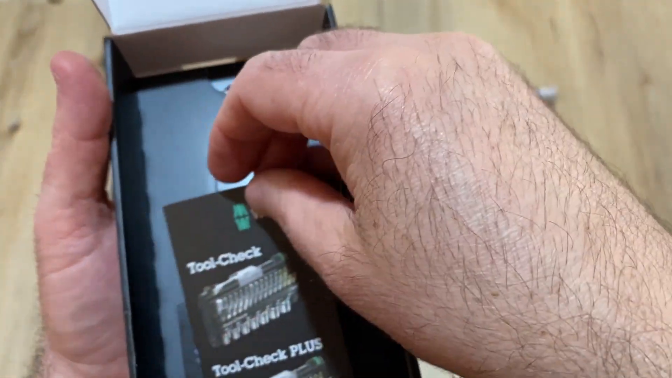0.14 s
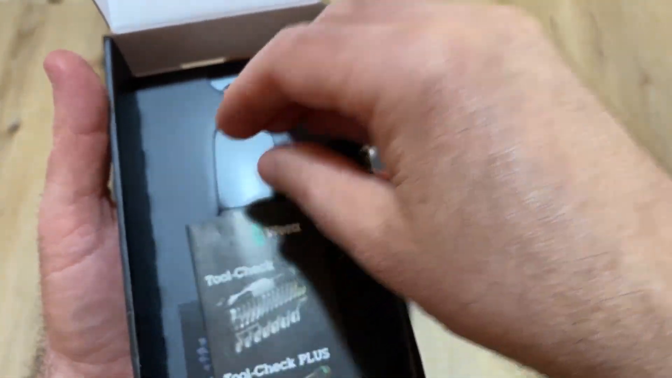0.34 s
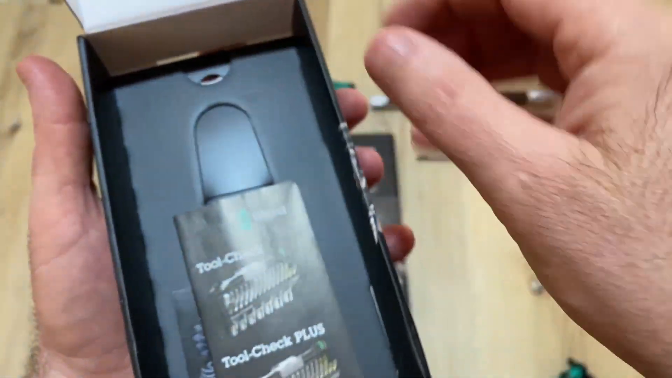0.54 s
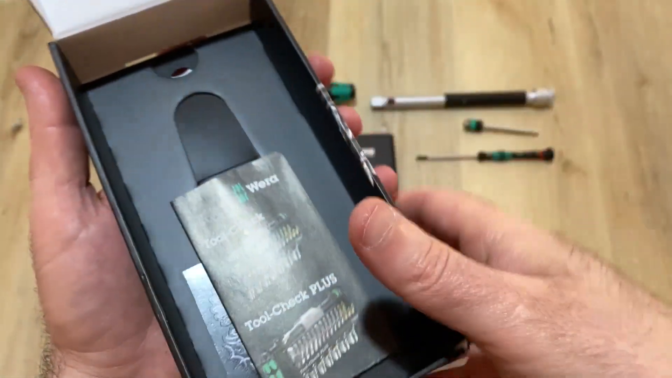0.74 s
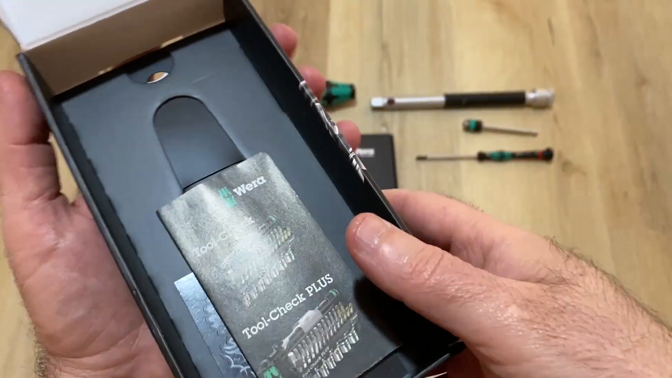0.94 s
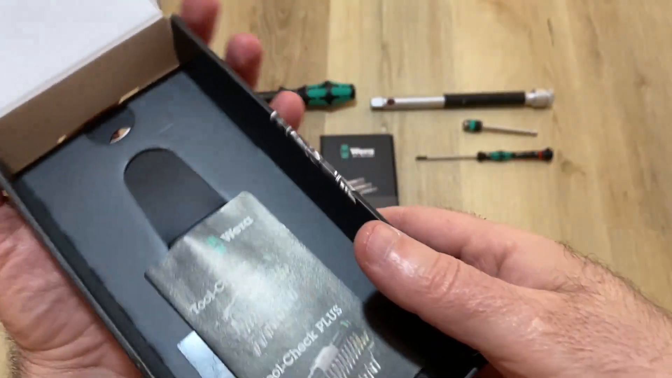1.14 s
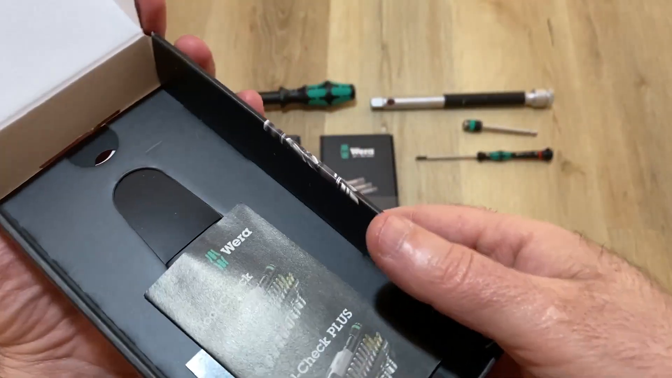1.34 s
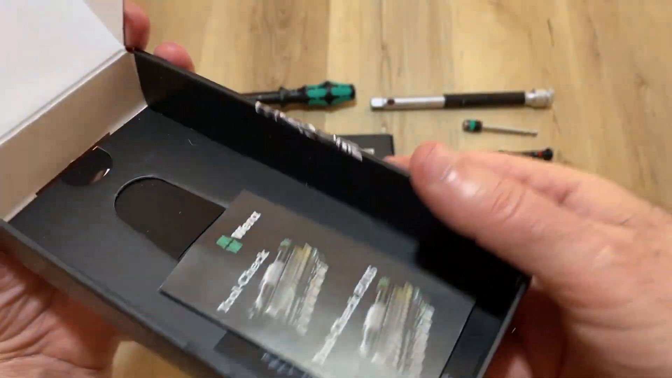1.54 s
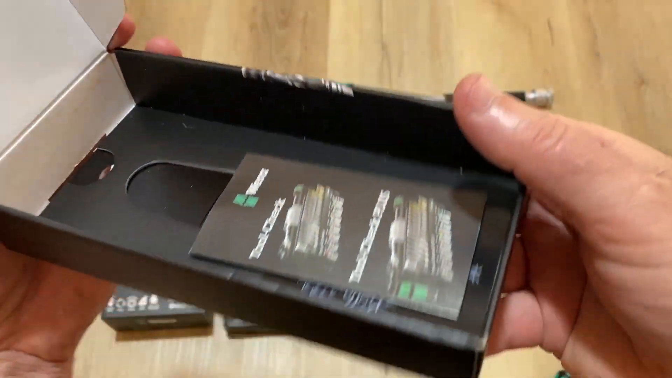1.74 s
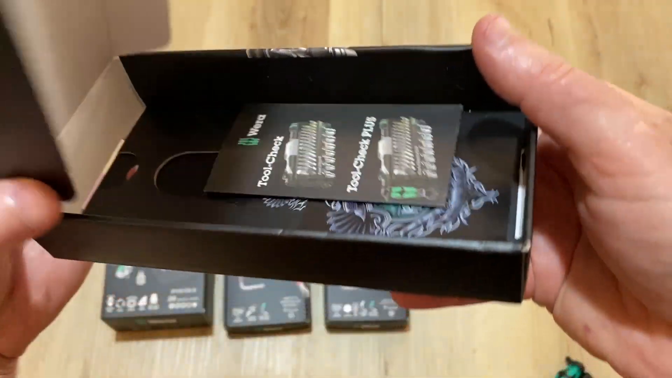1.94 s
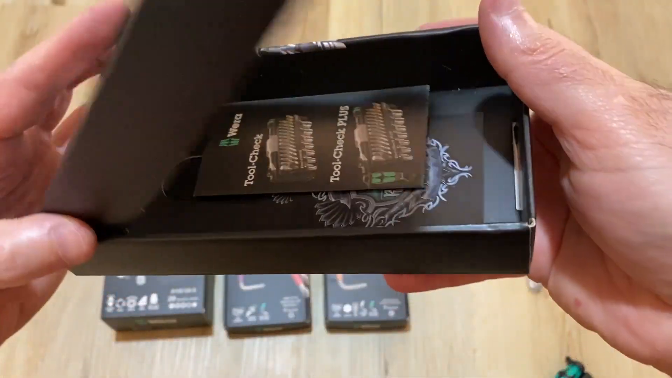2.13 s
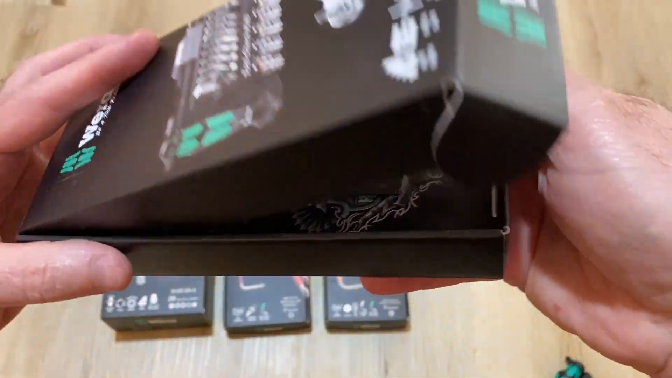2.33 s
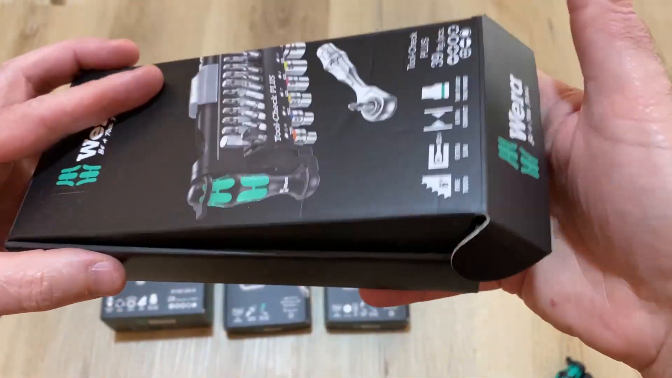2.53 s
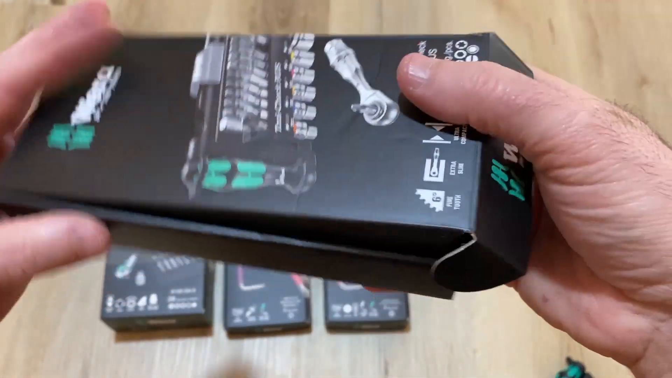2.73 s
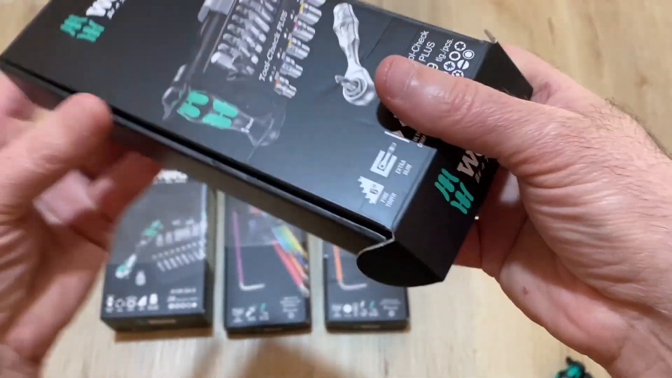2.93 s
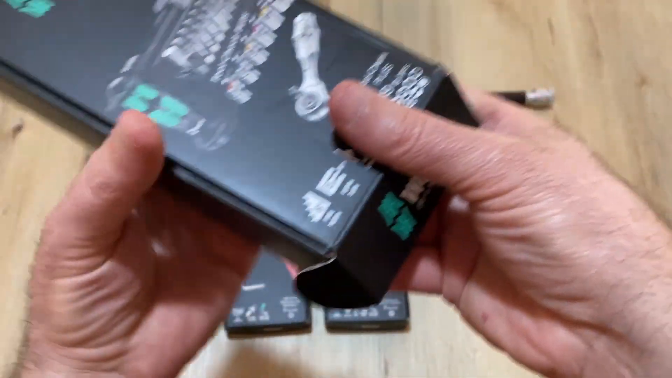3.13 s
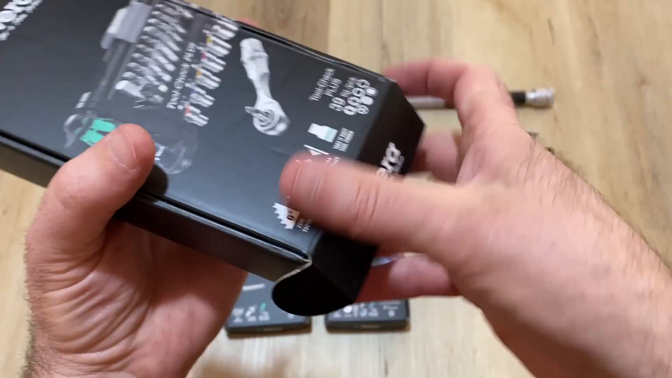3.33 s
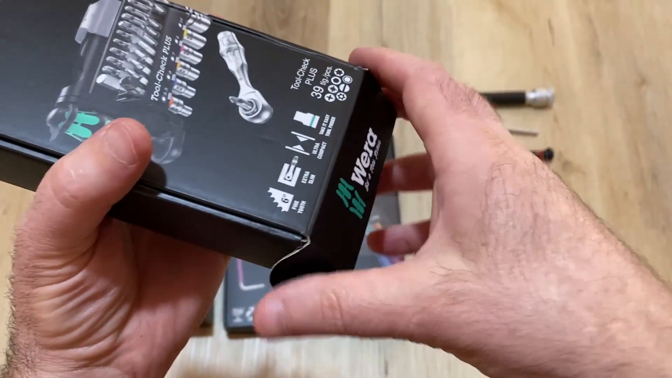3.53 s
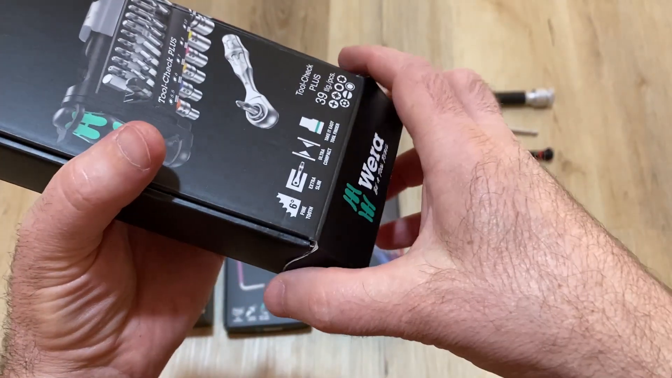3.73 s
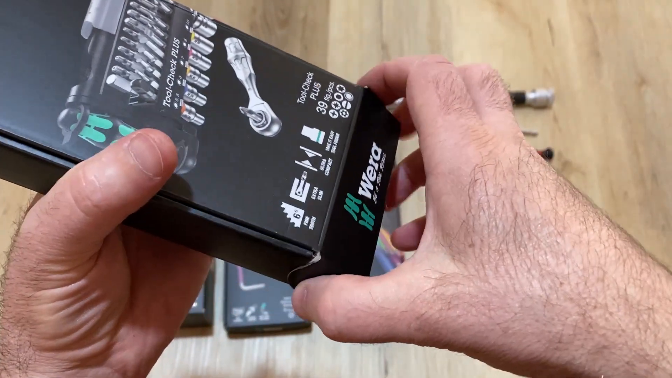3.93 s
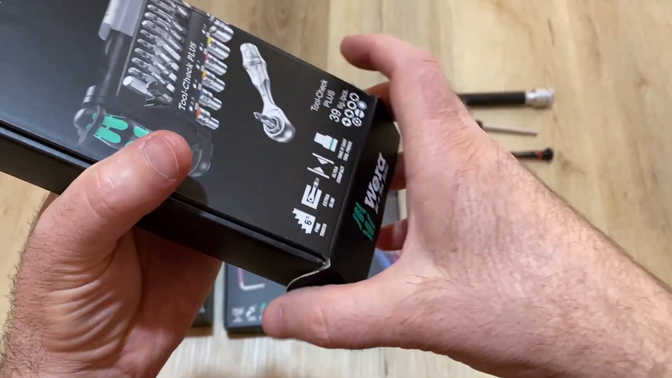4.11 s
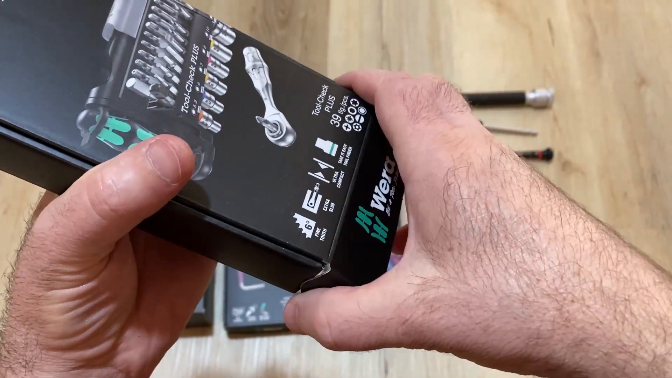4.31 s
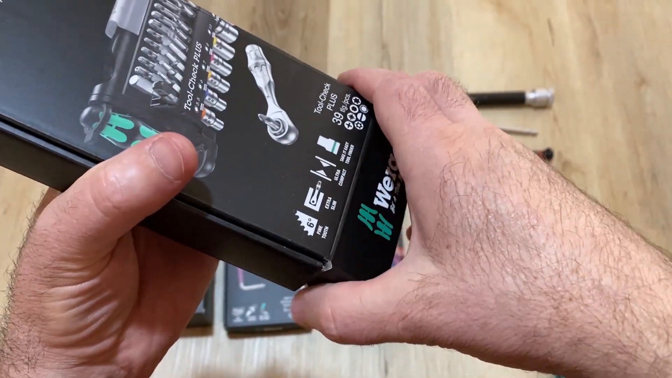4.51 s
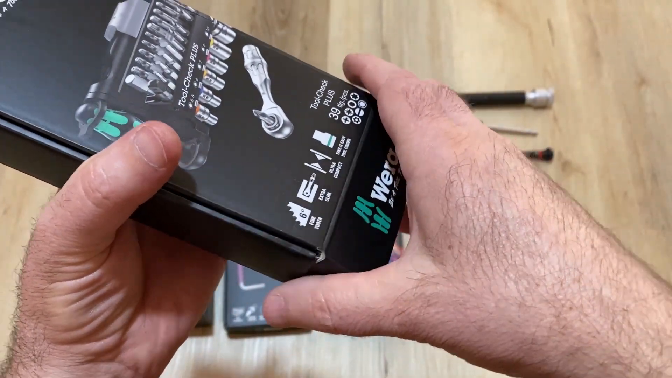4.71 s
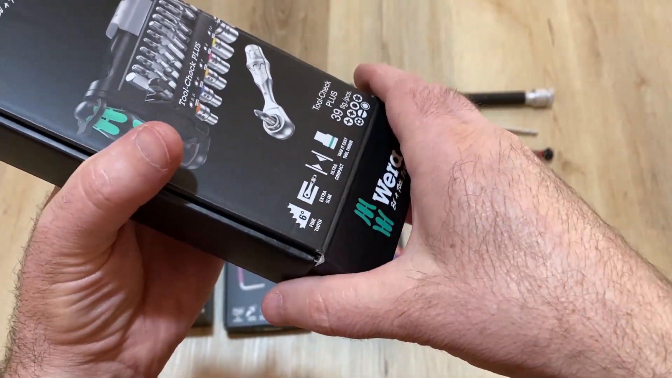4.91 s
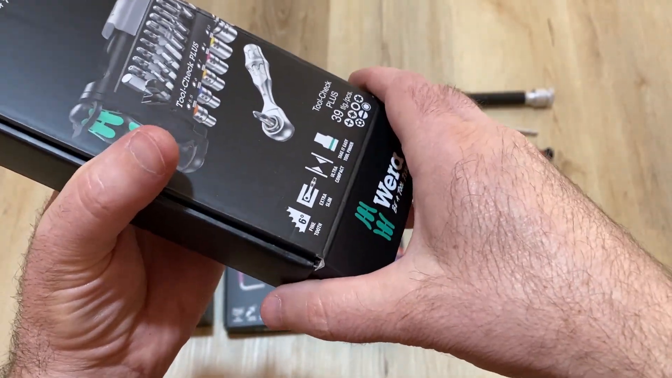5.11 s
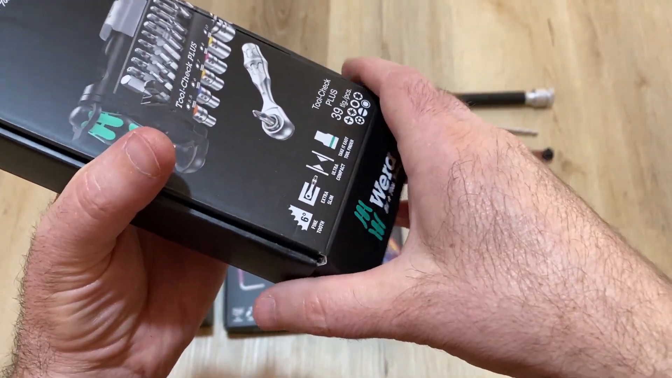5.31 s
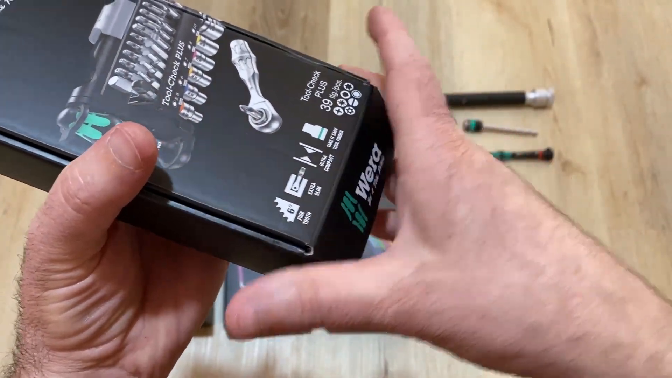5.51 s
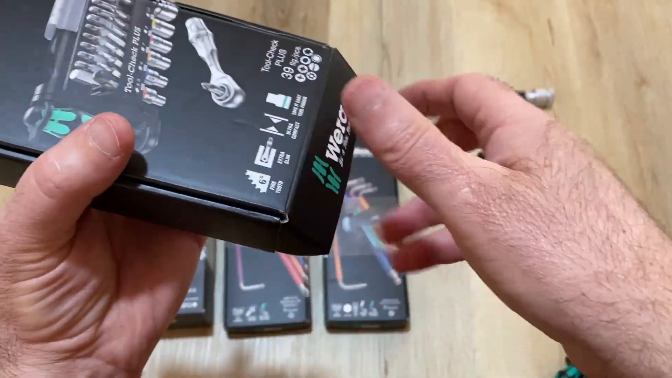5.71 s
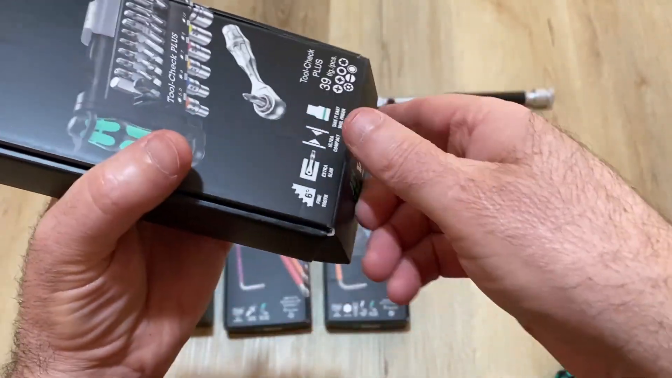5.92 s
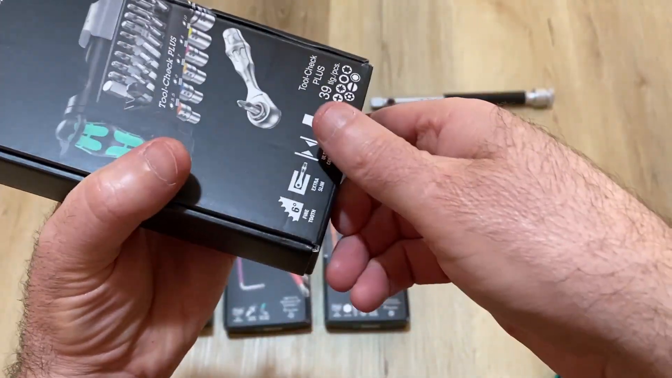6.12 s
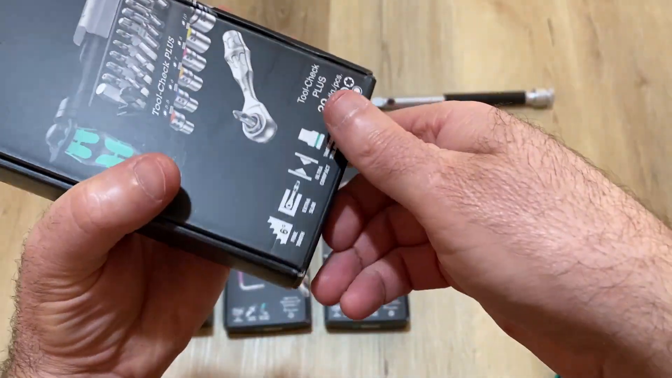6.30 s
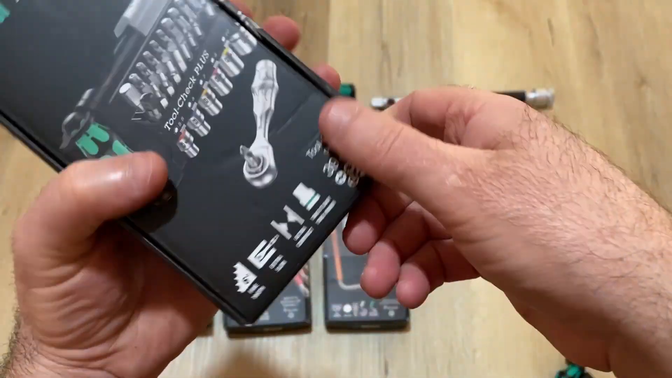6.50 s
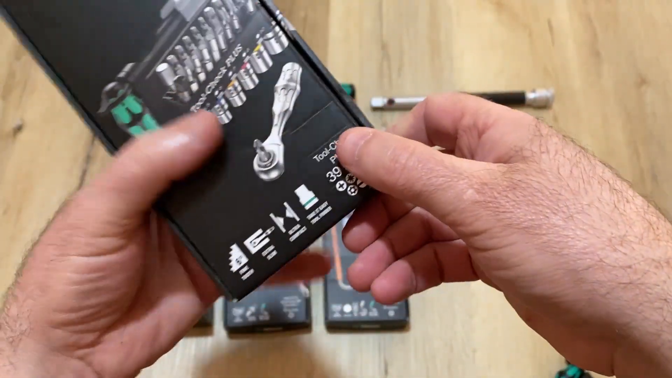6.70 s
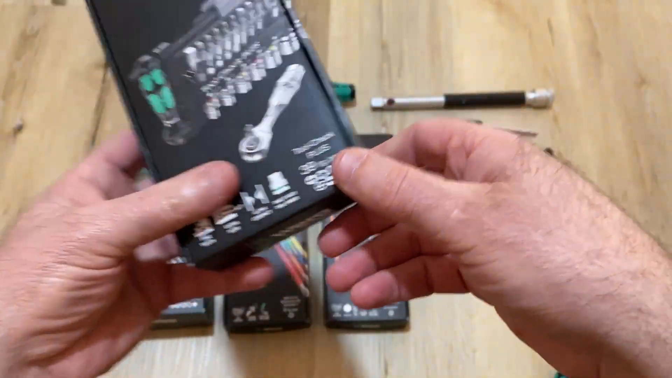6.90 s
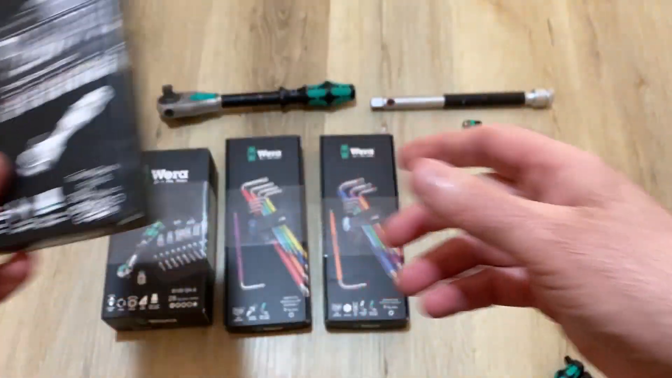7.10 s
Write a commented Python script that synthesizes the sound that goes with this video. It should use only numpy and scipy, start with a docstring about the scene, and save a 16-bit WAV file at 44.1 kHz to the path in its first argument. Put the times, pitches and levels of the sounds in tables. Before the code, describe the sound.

Small cardboard box handled close up: soft skin rubbing, a hollow lid knock, scraping card, then two sharp snaps as tabs and flap close.

```python
"""In a living room, a small cardboard box is handled over a wooden table, close to a camera's microphones.
A leaflet is laid in, skin slides over the card, the lid knocks shut and its flap scrapes into place.
Fingers press on the end until the tabs snap home; the table top and the room answer.
Friction is random slips through spectra, snaps and taps are coloured noise bursts, and thumps are dying
sines; an inverted echo, a diffuse room tail and faint air noise surround them."""
import sys
import numpy as np
from scipy import signal
from scipy.fft import rfft, irfft, next_fast_len
from scipy.io import wavfile
from scipy.ndimage import uniform_filter1d, map_coordinates

SR = 44100
rng = np.random.default_rng(int(sys.argv[2]) if len(sys.argv) > 2 else 0)


def store_pcm(level_fs):
    """Save levels as 16-bit WAV."""
    pcm = np.round(np.clip(level_fs, -1, 1) * 32767).astype(np.int16)
    wavfile.write(sys.argv[1], SR, np.atleast_2d(pcm).T)


N = 315315

# grip as the box shifts in the hands: t/s, relative level/dB
GRIP = [(0.0, -72), (0.2, -68), (1.75, -72), (2.09, -67.5), (3.03, -73), (3.36, -76), (4.32, -74),
        (4.5, -69), (4.88, -77.5), (5.14, -75), (5.26, -68), (5.67, -79.5), (6.01, -70.5), (7.15, -80.5)]
# a cut card edge: f/Hz, relative level/dB per Hz
EDGE_SPECTRUM = [(200, -20.5), (550, -17.5), (1030, -1.5), (1450, -6.5), (2000, -3.5), (2550, -5.5),
                 (3050, 3), (4000, -2.5), (5000, -10.5), (8000, -12.5), (12000, -8), (16000, -22)]
# colours of the four loud snaps: f/Hz, relative level/dB per Hz
LID_KNOCK = [(150, -22.5), (400, -1.5), (700, -19.5), (950, -1.5), (1700, 2.5), (2300, -3.5), (4000, -12),
             (7000, -22.5), (16000, -27.5)]
FIRST_TAB = [(100, -32.5), (230, -9), (450, -35), (650, -14), (1000, -0.5), (1350, -11.5), (1750, 4),
             (2400, -8.5), (3300, 0), (5000, 2.5), (6200, 6.5), (7800, -7.5), (15000, 0)]
SECOND_TAB = [(200, -8.5), (450, -15), (660, 1.5), (1000, 4.5), (1900, 1), (2400, -2), (3300, -2),
              (5700, 1), (8500, -6.5), (12500, -1), (14800, 5), (16500, -2)]
END_FLAP = [(120, -38), (300, -14), (480, -21), (640, -2), (1150, -1.5), (1700, -6), (2200, -7), (2900, -4),
            (5000, -4.5), (8000, -13), (11000, -12), (16000, -33)]


def amp(db):
    """Decibels to gain."""
    return 10 ** (np.asarray(db) / 20)


def unit(x):
    """Scale to rms 1."""
    return x / np.sqrt(np.mean(x ** 2) + 1e-20)


def along(points, hz):
    """(f/Hz, value) points read on a log frequency axis."""
    f, v = np.transpose(points)
    return np.interp(np.log(hz + 1), np.log(f), v)


def gains(rows):
    """One gain per sample for each dB column, fading out beyond the rows."""
    s, *columns = np.transpose(rows)
    t = np.arange(N) / SR
    outside = np.abs(t - np.clip(t, s[0], s[-1]))
    fade = np.exp(-outside / 0.015)
    return np.array([amp(np.interp(t, s, column)) * fade for column in columns])


def wobble(rate):
    """A smooth random curve with rate knots a second."""
    knots = rng.standard_normal(int(N * rate / SR) + 4)
    return map_coordinates(knots, [np.arange(N) * rate / SR])


def filtered(x, response):
    """Shape x by a response of frequency."""
    n = x.shape[-1]
    m = next_fast_len(n + 4096)
    hz = np.fft.rfftfreq(m, 1 / SR)
    return irfft(rfft(x, m) * response(hz), m)[..., :n]


def add(track, s, sound):
    """Mix a sound into the track from time s on."""
    part = track[..., max(round(s * SR), 0):]
    part[..., :sound.shape[-1]] += sound[..., :part.shape[-1]]


def treble(hz):
    """A shelf from 0 at low frequencies to 1 in the treble."""
    return hz ** 2 / (hz ** 2 + 4000 ** 2)


def air():
    """The quiet room: steady noise of rms 1, independent at each microphone."""
    # f/Hz, relative level/dB per Hz
    quiet_spectrum = [(20, -1.5), (70, -3.5), (200, -16.5), (700, -7.5), (1500, -12), (5000, -17.5),
                      (16000, -35)]
    noise = rng.standard_normal((2, N))
    return unit(filtered(noise, lambda hz: amp(along(quiet_spectrum, hz))))


def room(x):
    """A diffuse tail in which each frequency dies at its own speed."""
    # decay of the reverberation: f/Hz, t60/s
    decay = [(100, 0.69), (500, 0.23), (2500, 0.54), (6000, 0.52), (15000, 0.28)]
    # colour of the reverberation: f/Hz, level/dB
    wet_colour = [(60, -14), (125, -4.5), (250, 1), (400, 8.5), (650, -2.5), (1000, -5.5), (2500, -2.5),
                  (6000, -7), (10000, -3), (16000, -18)]
    hz, t, z = signal.stft(rng.standard_normal((2, SR * 3 // 4)), SR, nperseg=256)
    dying = np.exp(-np.log(1000) * t / along(decay, hz)[:, None])
    tail = signal.istft(z * dying, SR, nperseg=256)[1]
    t = np.arange(tail.shape[1]) / SR
    onset = 1 - np.exp(-t / 0.00054)
    near_walls = 1 + 0.91 * np.exp(-t / 0.013)  # they answer first and loudest
    tail = tail * onset * near_walls
    wet = signal.fftconvolve(x, tail / np.linalg.norm(tail[0]), axes=1)[:, :N]
    return filtered(wet, lambda hz: amp(along(wet_colour, hz)))


def table_echo(x, delay_s=.00245, echo_db=-9):
    """The card's underside radiates in opposite phase; the table top throws that back a moment later."""
    return filtered(x, lambda hz: 1 - amp(echo_db) * np.exp(-2j * np.pi * hz * delay_s))


def placed(x):
    """Sound reaches two microphone ports around the camera body, differing in level and phase."""
    # f/Hz, left lead/rad
    port_phase = [(60, 0.3), (380, 0.16), (700, 0.93), (1150, 1.53), (1800, 1.03), (2700, 2), (3800, 1.5),
                  (5500, 1.22), (10000, 1.6), (15000, 1.9)]
    # f/Hz, left minus right level/dB
    port_balance = [(150, 0.5), (700, -0.5), (1150, 1.5), (1800, 1), (2700, 1), (3800, 5.5), (5500, 1),
                    (10000, 0)]
    sides = np.array([[.5], [-.5]])  # each port takes half the difference

    def ports(hz):
        level = amp(sides * along(port_balance, hz))
        return level * np.exp(1j * sides * along(port_phase, hz))

    return filtered(x, ports)


def shifting(x, depth_db):
    """As the contact moves and the grip changes, narrow bands swell and fade at random."""
    z = signal.stft(x, nperseg=1024)[2]
    field = uniform_filter1d(rng.standard_normal(z.shape[1:]), size=5, axis=0)  # across frequency
    field = uniform_filter1d(field, size=16, axis=1)  # across time
    return signal.istft(z * amp(depth_db * unit(field)), nperseg=1024)[1][:, :N]


def friction(spectrum, density, spread_db, direct):
    """Random tiny slips of uneven size, part direct and part scattered by box and hands; rms 1."""
    happens = rng.random((3, N)) < density / SR  # density in slips per second
    size = rng.standard_normal((3, N)) * amp(spread_db * rng.standard_normal((3, N)))
    slips = happens * size
    share = np.clip(direct, 0, 1)
    pair = np.sqrt(share) * placed(slips[0]) + np.sqrt(1 - share) * slips[1:]
    pair = shifting(pair, depth_db=2.2)
    return unit(filtered(pair, lambda hz: amp(along(spectrum, hz))))


def panels(card):
    """Panels thump as dying sines after a push and rumble in the hands, more so as card drags on them."""
    # thumps: t/s, f/Hz, level/dB
    thumps = [(.002, 105, -49), (0.044, 103, -47.5), (.155, 254, -43), (0.358, 300, -40.5),
              (.358, 443, -36.5), (0.366, 73, -47), (0.832, 148, -51.5), (1.283, 74.6, -46),
              (1.950, 850, -31.5), (1.986, 268, -27), (2.031, 982, -23.5), (2.037, 148, -32.5),
              (2.72, 63, -43), (3.133, 136, -52), (3.3, 217, -56.5), (4.492, 181, -30), (4.496, 126, -22),
              (5.128, 770, -22.5), (5.147, 167, -46.5), (5.895, 148, -47.5), (6.819, 106, -49),
              (6.827, 259, -58)]
    # low rumble: f/Hz, relative level/dB per Hz
    rumble_spectrum = [(20, -27), (40, -6.5), (70, 3), (130, -7), (270, -6.5), (450, -13), (1000, -20.5),
                       (3000, -74)]
    out, t = np.zeros(N), np.arange(SR // 2) / SR
    for s, hz, db in thumps:
        t60_s = 0.105 * (100 / hz) ** 0.61  # higher pitches die sooner
        decay = np.exp(-np.log(1000) * t / t60_s)
        onset = 1 - np.exp(-t / 0.00026)
        add(out, s, amp(db) * np.sin(2 * np.pi * hz * t) * decay * onset)
    holding = amp(1.5) * gains(GRIP)[0]
    dragging = amp(-18.5) * card
    unsteady = amp(2.2 * wobble(14))
    rumble = friction(rumble_spectrum, density=1800, spread_db=1, direct=0.97)
    return placed(out) + np.hypot(holding, dragging) * unsteady * rumble


def strokes(rows, attack_s, release_s, arch_db):
    """Gain of (start, end, dB, swell dB) strokes: the hand sets off, is fastest midway and lets go."""
    t, power = np.arange(0, N, 32) / SR, 0
    for start, end, db, swell_db in rows:
        way = np.clip((t - start) / max(end - start, attack_s), 0, 1) - .5
        rise = .5 + .5 * np.tanh(2 * (t - start) / attack_s)
        fall = np.exp(-np.maximum(t - end, 0) / release_s)
        level = amp(db + swell_db * way - arch_db * (2 * way) ** 2)
        power = power + (rise * fall * level) ** 2
    return np.interp(np.arange(N) / SR, t, np.sqrt(power))


def contact():
    """Every stroke drives skin hiss, card rasp and hollow ring, each by its own share."""
    # skin slides over the smooth print: start/s, end/s, relative hiss/dB, rasp drive re hiss drive/dB
    slides = [(0.0, 0.023, -65, 4.5), (0.15, 0.194, -59.5, -0.5), (0.703, 0.709, -67.5, -0.5),
              (0.77, 0.808, -62.5, 2.5), (0.837, 0.93, -54.5, -0.5), (0.984, 1.246, -54, -9),
              (1.054, 1.107, -49.5, -22), (1.246, 1.255, -47, -8.5), (1.427, 1.518, -51, -10),
              (1.54, 1.82, -56, -6.5), (1.808, 2.01, -51, -10.5), (2.185, 2.255, -47, -7.5),
              (2.41, 2.427, -47.5, 4), (2.846, 2.907, -45, 3), (2.94, 3.326, -51, -13),
              (3.32, 3.412, -57.5, -21), (3.591, 3.648, -65, 2.5), (3.85, 3.93, -55.5, 1),
              (4.062, 4.088, -49.5, -22.5), (4.147, 4.164, -61.5, -8), (4.756, 4.838, -64, 5.5),
              (4.87, 4.927, -62.5, 3), (5.378, 5.411, -48, -14.5), (5.44, 5.537, -60.5, -2.5),
              (5.578, 5.635, -59, -7), (6.202, 6.322, -66, -3.5), (6.386, 6.694, -53, -11.5),
              (6.444, 6.53, -52.5, -10), (6.571, 6.617, -50, -31), (6.699, 6.869, -49, -16.5),
              (6.89, 6.99, -56.5, -12.5), (7.02, 7.132, -56, -16.5)]
    # card drags on card, or a fingertip on a wall: start/s, end/s, relative rasp/dB,
    # swell over the stroke/dB, hiss drive re rasp drive/dB, hollow ring drive re rasp drive/dB
    rubs = [(0.103, 0.42, -64, -9.5, -8.5, -13), (1.263, 1.443, -65.5, 8, -3.5, -7),
            (1.514, 1.594, -55.5, -1, 0, -39), (2.028, 2.455, -47, -2.5, -7.5, -14.5),
            (2.522, 2.71, -52.5, -24, 0, -14.5), (2.757, 3.065, -48.5, 1.5, -7, -8),
            (3.05, 3.14, -69.5, -8, -6, 9), (3.73, 3.817, -56.5, 2, -5.5, 2),
            (3.83, 3.961, -58.5, 1, -2.5, 0), (4.04, 4.097, -60, -10.5, -9.5, 2),
            (4.125, 4.218, -72, 12.5, -13.5, 6.5), (4.247, 4.335, -55, -7, -17.5, -0.5),
            (4.397, 4.475, -64.5, 15, -15, 2), (4.63, 4.733, -60.5, -1.5, -4, -12),
            (4.90, 4.955, -66, 2.5, -6.5, 3), (5.01, 5.043, -66.5, -4, 1.5, -13),
            (5.078, 5.13, -62.5, 0.5, 1.5, 5), (5.19, 5.433, -61.5, 16.5, -4, 0),
            (5.629, 5.649, -72.5, -10, 2, 12.5), (5.917, 6.133, -48, -3, -8, -10.5),
            (6.172, 6.258, -64, 7, -18, -12)]
    slide = lambda rows: strokes(rows, attack_s=0.025, release_s=0.033, arch_db=2.5)
    rub = lambda rows: strokes(rows, attack_s=0.026, release_s=0.015, arch_db=0.5)
    sliding = slide([(a, b, db, 0) for a, b, db, rasp in slides])
    sliding_rasp = slide([(a, b, db + rasp, 0) for a, b, db, rasp in slides])
    rub_hiss = rub([(a, b, db + hiss, swell) for a, b, db, swell, hiss, ring in rubs])
    rub_rasp = rub([row[:4] for row in rubs])
    rub_ring = rub([(a, b, db + ring, swell) for a, b, db, swell, hiss, ring in rubs])
    skin = np.hypot(sliding, rub_hiss)
    card = np.hypot(sliding_rasp, rub_rasp)
    hollow = np.hypot(amp(-26) * sliding, rub_ring)
    return skin, card, hollow


def rubbing(skin, card, hollow):
    """Skin hisses on the smooth print, card rasps on card, and the hollow box rings along."""
    # the lid's side flaps brush the walls: t/s, relative level/dB
    lid_brush = [(2.08, -82), (2.126, -53.5), (2.416, -56), (2.554, -51.5), (2.68, -93)]
    # spectra of hiss, rasp, hollow ring and flaps: f/Hz, relative level/dB per Hz
    skin_spectrum = [(1000, -20), (2500, 1.5), (4200, 6), (6500, 4.5), (8200, 3), (10000, 9), (13000, 4),
                     (15000, 5)]
    card_spectrum = [(300, -29.5), (600, -11), (1080, -4.5), (1400, 1.5), (1950, 0.5), (2350, 1),
                     (3000, 0.5), (4000, -5), (7000, -14), (16000, -41.5)]
    hollow_spectrum = [(150, -17.5), (300, -13.5), (520, -14.5), (610, -5.5), (680, 3), (760, -5.5),
                       (880, -8), (1100, -4.5), (1400, -34), (4000, -57)]
    flap_spectrum = [(400, -39), (750, -6.5), (960, 5), (1200, -7.5), (2500, -19.5), (6000, -47)]
    pressure = amp(1.2 * wobble(50))
    hiss = amp(1.82) * skin * friction(skin_spectrum, density=12000, spread_db=-0.5, direct=1.0)
    rasp = amp(-0.38) * card * friction(card_spectrum, density=4000, spread_db=1, direct=.45)
    # fingertips stick and slip on the end wall, and stir it even while they only hold it
    stutter = amp(1.2 * wobble(35))
    stirring = np.hypot(amp(-1.0) * hollow, amp(-6.5) * gains(GRIP)[0])
    ring = stutter * stirring * friction(hollow_spectrum, density=990, spread_db=-1.5, direct=0.65)
    brushing = friction(flap_spectrum, density=4000, spread_db=2, direct=.3)
    flaps = amp(3.0) * gains(lid_brush)[0] * brushing
    return pressure * (hiss + rasp + ring + flaps)


def scrapes():
    """A cut edge drags harder and harder, chattering, then slips free; a shorter free edge rings higher."""
    # t/s, level/dB, rise time constant/s, decay time constant/s, treble/dB, pitch ratio of the edge's ring
    catches = [(0.294, -68.5, 0.005, 0.0024, 22.5, 1), (0.357, -35, 0.0027, 0.0021, -9.5, 0.92),
               (2.49, -31, 0.01, 0.01, 1.5, 1.01), (2.515, -22.5, 0.0096, 0.0044, 3, 0.96),
               (2.548, -37.5, 0.014, 0.0214, 3.5, 0.84), (2.718, -38.5, 0.009, 0.013, 4, 0.9),
               (3.179, -34, 0.0041, 0.0067, -2, 1.08), (3.237, -30.5, 0.0021, 0.01, 1.5, 1.12),
               (3.298, -45.5, 0.0039, 0.013, 7.5, 0.87), (3.497, -63, 0.0046, 0.015, 7, 1.42),
               (3.996, -42, 0.0094, 0.0076, -8, 0.97), (5.896, -47, 0.0038, 0.01, 7.5, 1.06)]
    t, out = np.arange(N) / SR, np.zeros((2, N))
    unevenness = amp(1.8 * wobble(450))
    chatter = unevenness * friction(EDGE_SPECTRUM, density=2800, spread_db=-0.5, direct=.55)
    for s, db, rise, fall, treble_db, pitch in catches:
        near = np.abs(t - s) < .2
        time_constant = np.where(t[near] < s, rise, fall)
        swell = amp(db) * np.exp(-np.abs(t[near] - s) / time_constant)

        def colour(hz):
            repitched_db = along(EDGE_SPECTRUM, hz / pitch) - along(EDGE_SPECTRUM, hz)
            return amp(treble_db * treble(hz) + repitched_db)

        out[:, near] += filtered(chatter[:, near] * swell, colour)
    return out


def box(hz):
    """Causal response of the box's air and wall resonances, alternating in sign."""
    # f/Hz, width/Hz, relative level/dB
    resonances = [(700, 220, 4.5), (1018, 1400, -11.5), (1630, 100, -15), (3090, 140, -13.5)]
    total = 0
    for k, (centre, width, db) in enumerate(resonances):
        resonance = 1j * hz * width / (centre * centre - hz * hz + 1j * hz * width)
        total = total + (-1) ** k * amp(db) * resonance
    return total


def crack(length_s, colour, apart=0.35, size=4096):
    """Fibres give way in a short burst that rings with the card's colour; stereo, mean channel energy 1."""
    t, hz = np.arange(size) / SR, np.fft.rfftfreq(size, 1 / SR)
    noise = rng.standard_normal(size) + apart * rng.standard_normal((2, size))
    burst = rfft(noise * t * np.exp(-2 * t / length_s))
    cepstrum = irfft(along(colour, hz) * np.log(10) / 20)
    cepstrum[1:size // 2] *= 2  # minimum phase: the card rings only after it is struck
    cepstrum[size // 2 + 1:] = 0
    # a fracture excites all frequencies nearly alike
    flat = burst / (np.abs(burst) + 1e-20) ** .7
    ring = irfft(flat * np.exp(rfft(cepstrum)))[:, :size // 2]
    return unit(ring) / np.sqrt(size // 2)


def taps():
    """Light contacts of fingers and card edges tick and ring the box."""
    # t/s, strength/dB, treble/dB, relative box ring/dB
    contacts = [(.150, -21, -6, -22), (.358, -20, -44, 0), (0.833, -43.5, 20.5, -10),
                (1.948, -4, -14.5, -35), (2.031, -14, 2, 9.5), (2.414, -26, -2, 5.5),
                (2.713, -15.5, -25, -7.5), (3.497, -37.5, 13.5, 2), (3.663, -42.5, -13, 15.5),
                (3.989, -27.5, 10, -4), (4.096, -33.5, -17.5, 18.5), (4.128, -29.5, -8, -6),
                (4.699, -39, 7, 5.5), (5.892, -24, -3.5, 8.5), (5.944, -35, -7, -17), (6.38, -39, 1, -14),
                (6.826, -25, -15, 6), (7.042, -37, 13, 1)]
    # f/Hz, relative level/dB per Hz
    tick_colour = [(100, -14.5), (500, -11.5), (1400, -7.5), (3200, -6.5), (6000, -12.5), (16000, -7)]
    out = np.zeros((2, N))
    for s, db, treble_db, ring_db in contacts:
        tick = crack(0.0022, tick_colour)
        response = lambda hz: amp(treble_db * treble(hz)) + 2 * amp(ring_db) * box(hz)
        add(out, s, amp(db) * filtered(tick, response))
    return out


def snaps():
    """Stiff card snaps through: the lid lands, and the tabs and end flap spring into their slots."""
    # t/s, strength/dB, crack length/s, relative box ring/dB, colour
    closures = [(1.98, 1.5, 0.00033, -6.5, LID_KNOCK), (4.4738, 8, 0.00098, -24.5, FIRST_TAB),
                (4.4918, 6.5, 0.0015, -12.5, SECOND_TAB), (5.1271, 6, 0.0015, -8.5, END_FLAP)]
    out = np.zeros((2, N))
    for s, db, length_s, ring_db, colour in closures:
        snap = crack(length_s, colour)
        add(out, s, amp(db) * filtered(snap, lambda hz: 1 + 2 * amp(ring_db) * box(hz)))
    return out


def scene():
    """Clicks, scrapes and rubbing in a quiet room."""
    clicks = placed(table_echo(snaps() + taps()))
    skin, card, hollow = contact()
    scraping = scrapes()
    rubs = rubbing(skin, card, hollow)
    thumps = panels(card)
    to_room = amp(-3.5) * clicks + amp(-13.5) * scraping + amp(-9) * rubs + amp(-11.5) * thumps
    return clicks + scraping + rubs + thumps + room(to_room) + amp(-77.0) * air()


def record(dry):
    """The camera sheds deep bass, rounds off the highest peaks and cuts steeply above its band limit."""
    top_hz = 16300
    lean = signal.sosfilt(signal.butter(4, 44, "highpass", fs=SR, output="sos"), dry)
    rounded = lean / (1 + np.abs(lean / .85) ** 6) ** (1 / 6)
    return filtered(rounded, lambda hz: 1 / np.sqrt(1 + (hz / top_hz) ** 160))


dry = scene()
out = record(dry)
store_pcm(out)
```